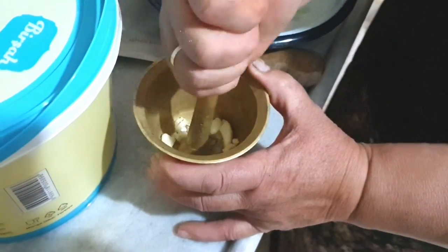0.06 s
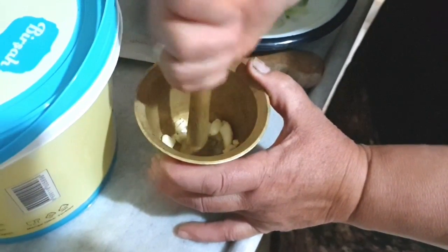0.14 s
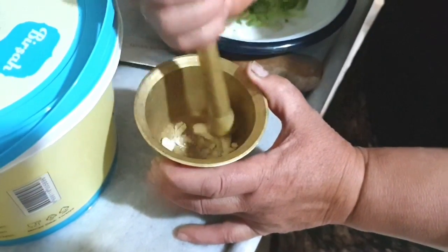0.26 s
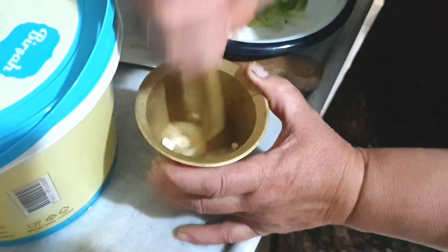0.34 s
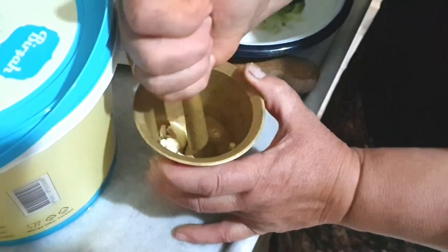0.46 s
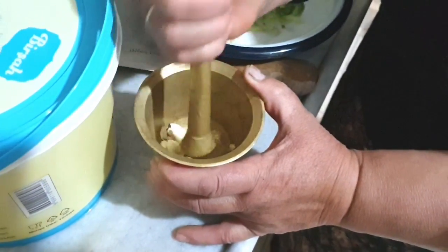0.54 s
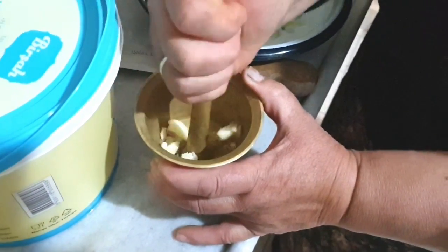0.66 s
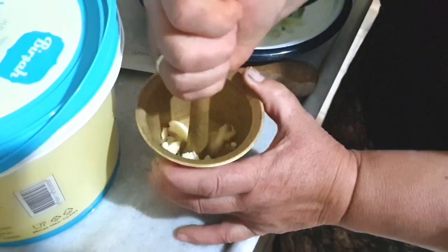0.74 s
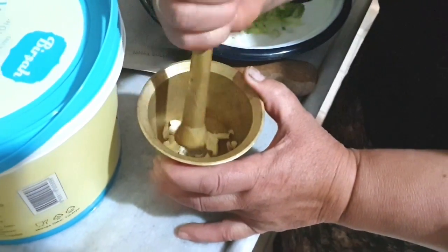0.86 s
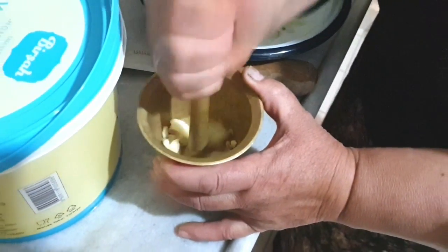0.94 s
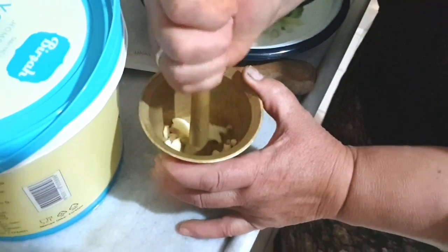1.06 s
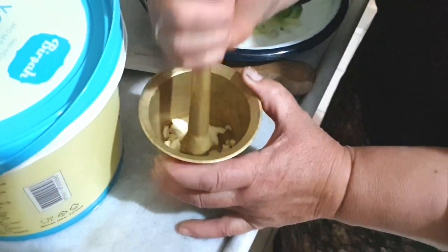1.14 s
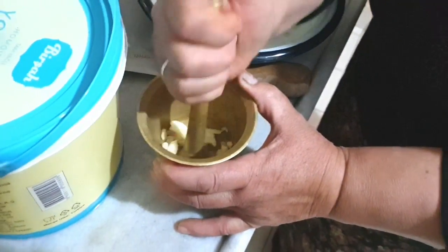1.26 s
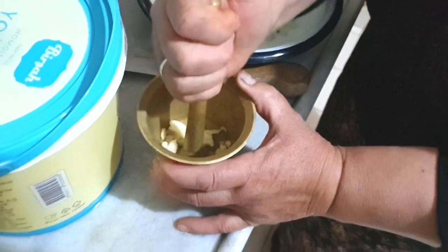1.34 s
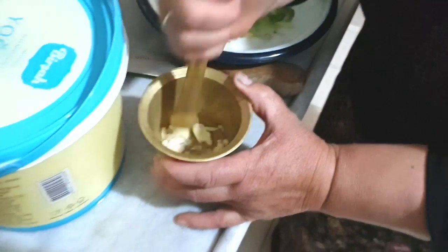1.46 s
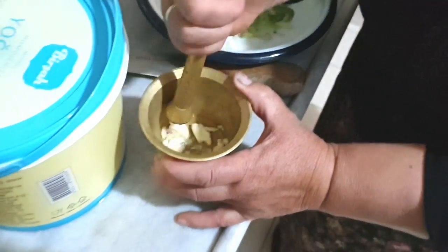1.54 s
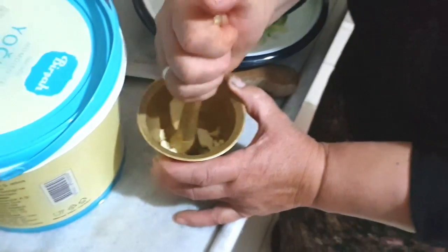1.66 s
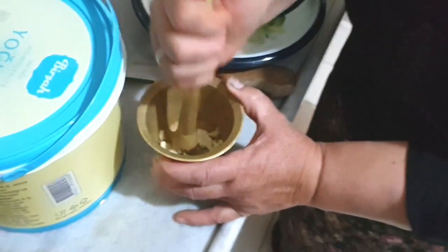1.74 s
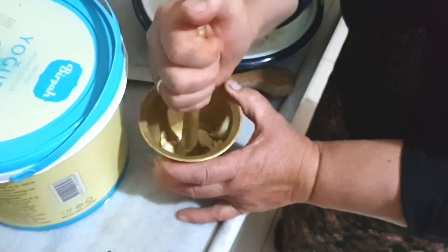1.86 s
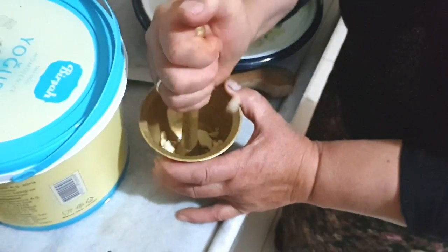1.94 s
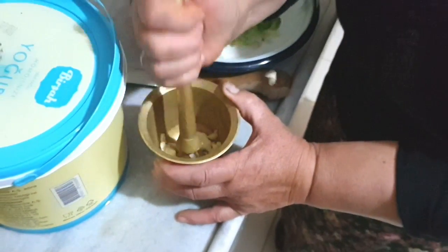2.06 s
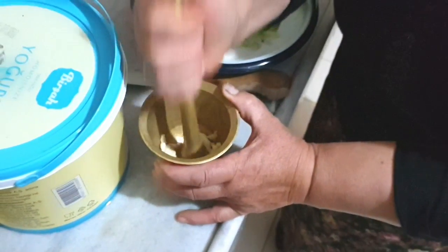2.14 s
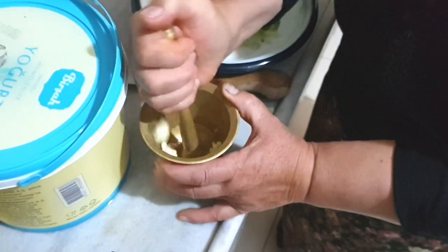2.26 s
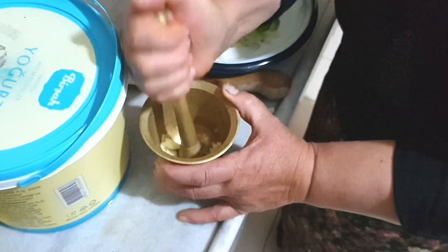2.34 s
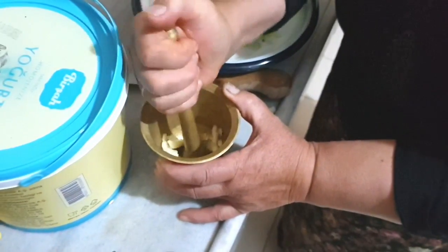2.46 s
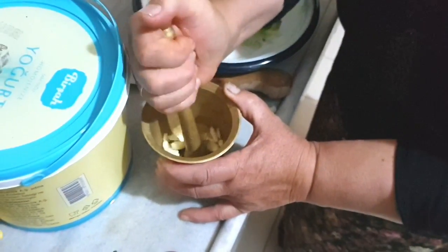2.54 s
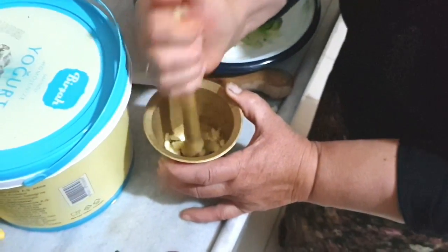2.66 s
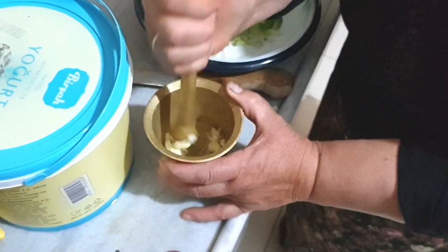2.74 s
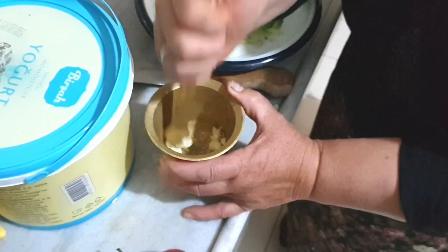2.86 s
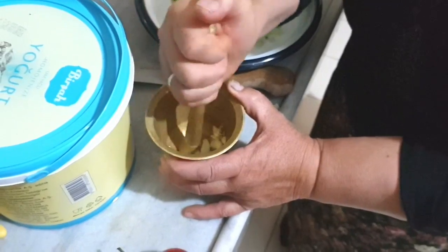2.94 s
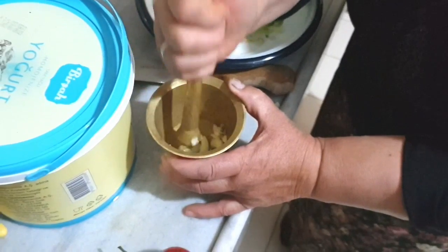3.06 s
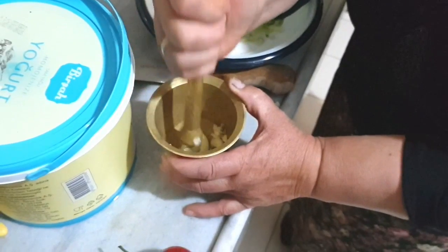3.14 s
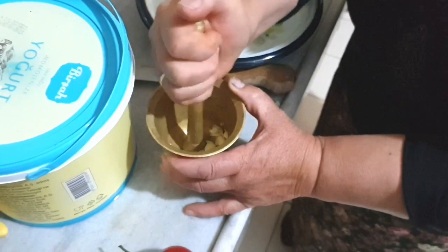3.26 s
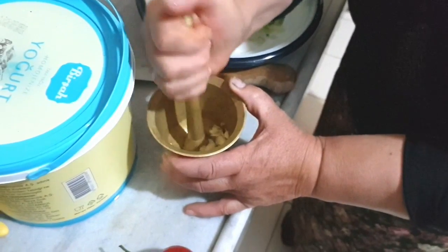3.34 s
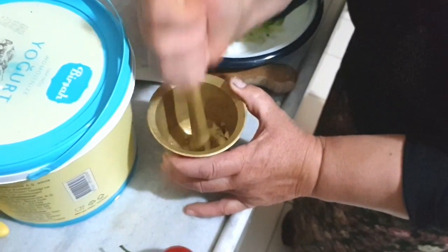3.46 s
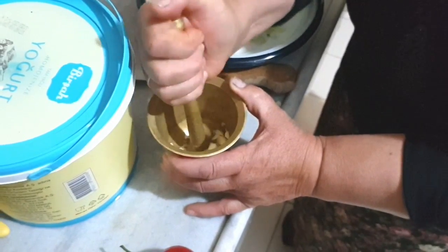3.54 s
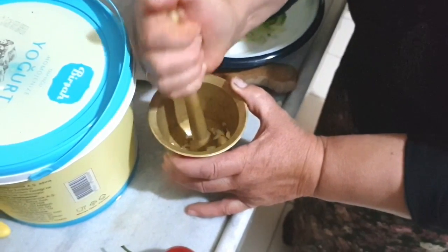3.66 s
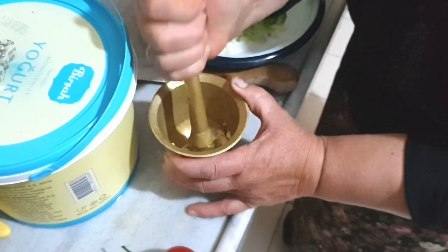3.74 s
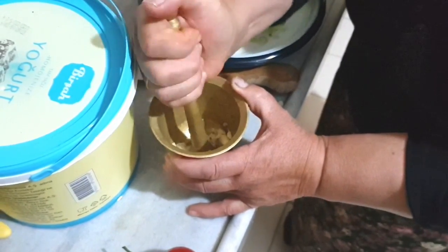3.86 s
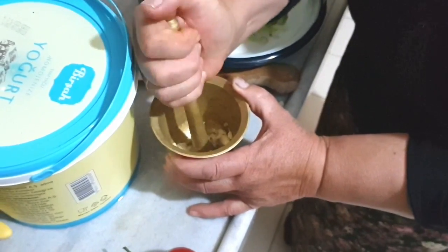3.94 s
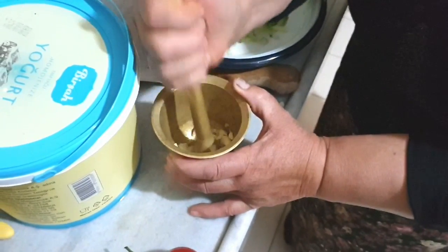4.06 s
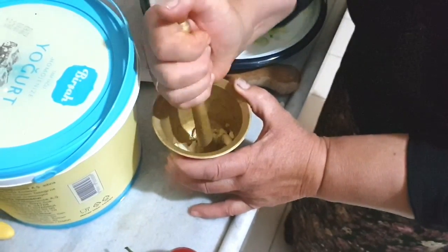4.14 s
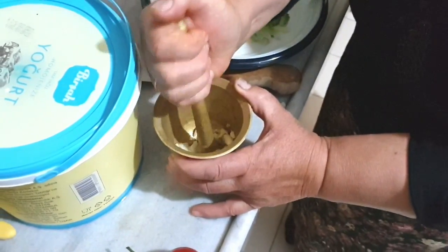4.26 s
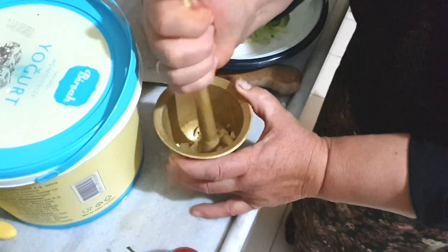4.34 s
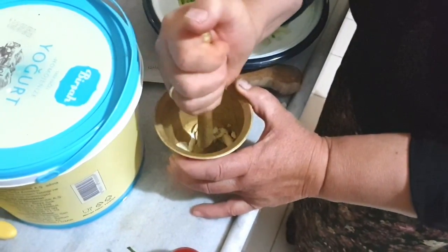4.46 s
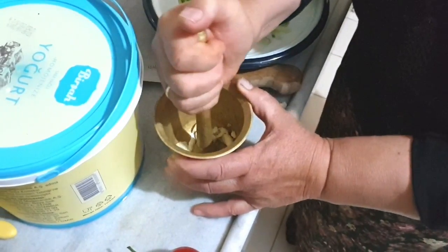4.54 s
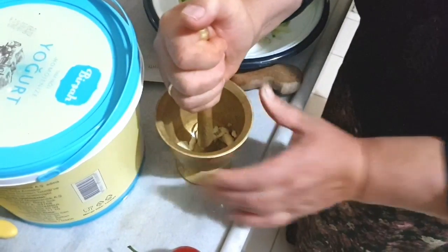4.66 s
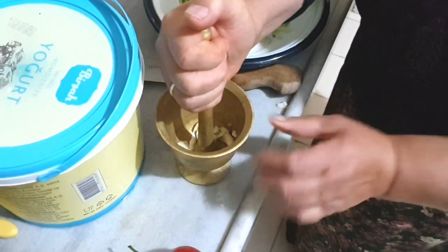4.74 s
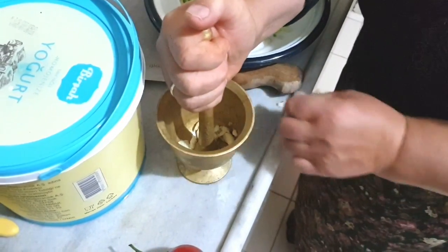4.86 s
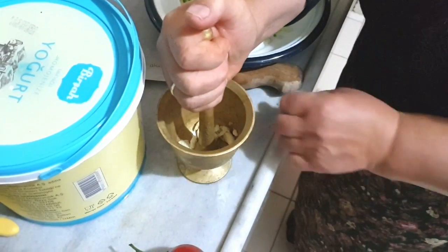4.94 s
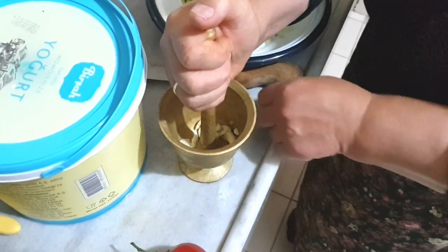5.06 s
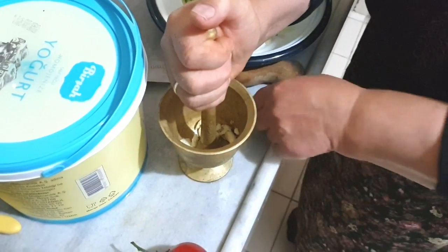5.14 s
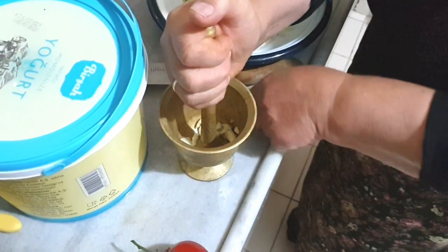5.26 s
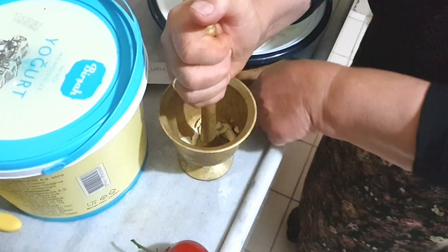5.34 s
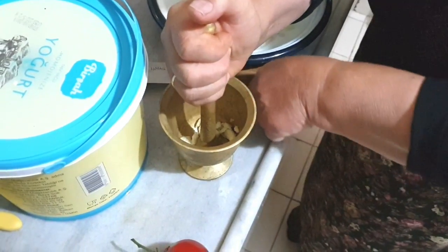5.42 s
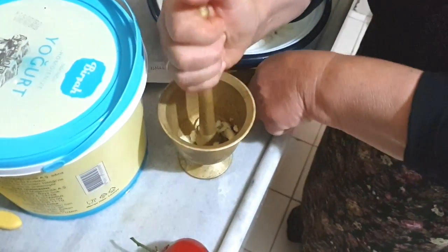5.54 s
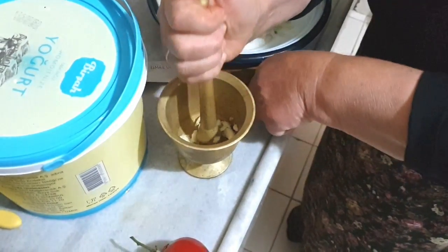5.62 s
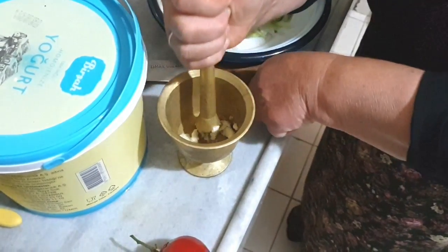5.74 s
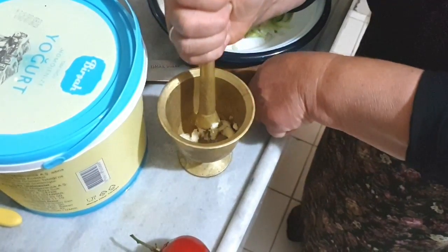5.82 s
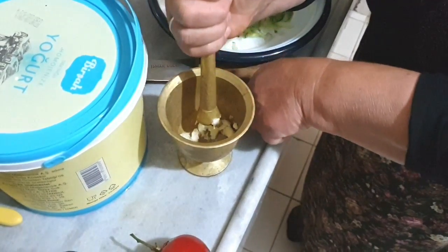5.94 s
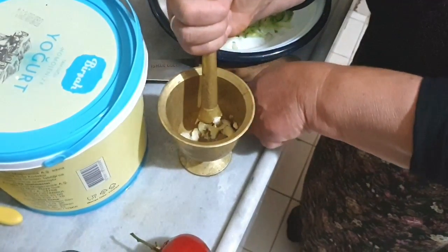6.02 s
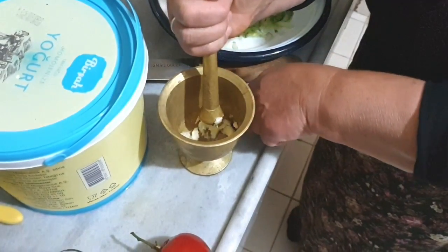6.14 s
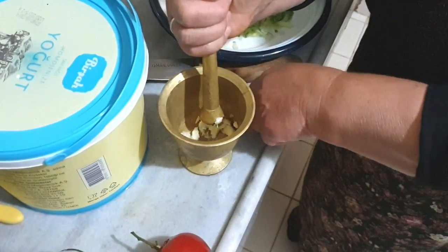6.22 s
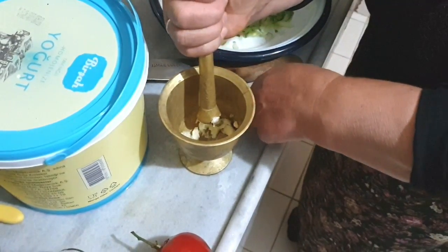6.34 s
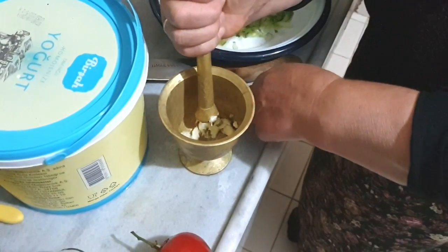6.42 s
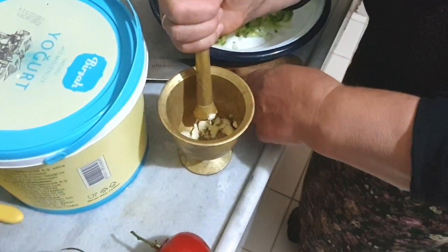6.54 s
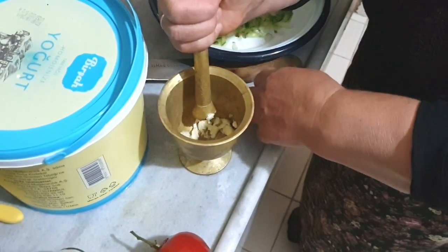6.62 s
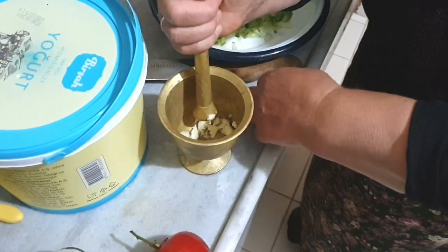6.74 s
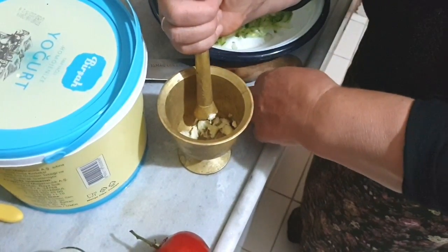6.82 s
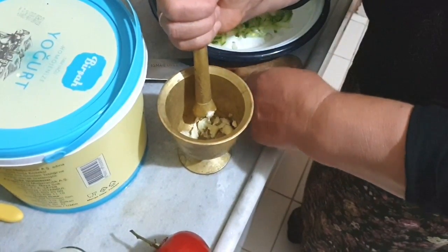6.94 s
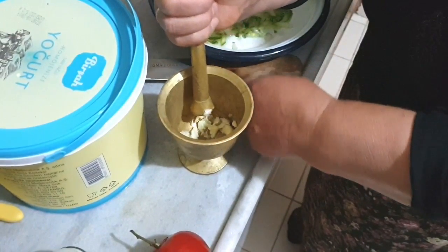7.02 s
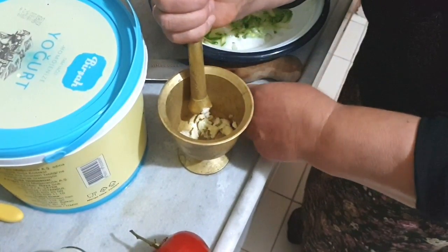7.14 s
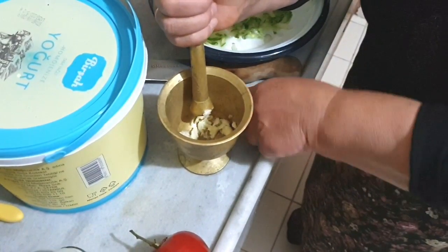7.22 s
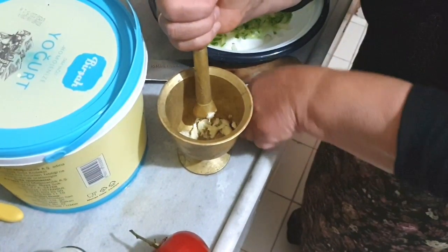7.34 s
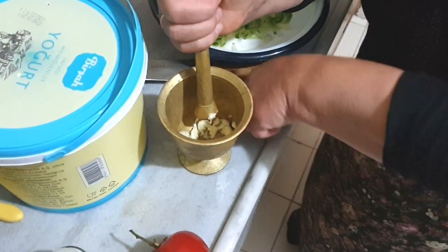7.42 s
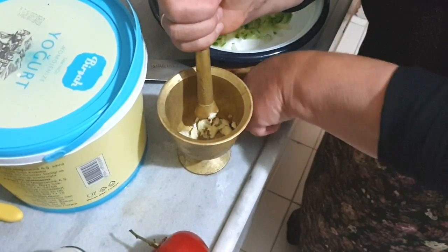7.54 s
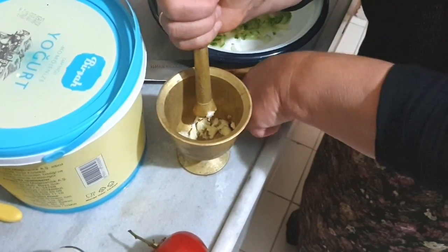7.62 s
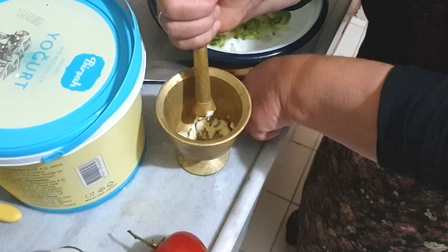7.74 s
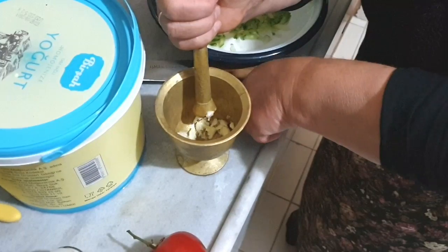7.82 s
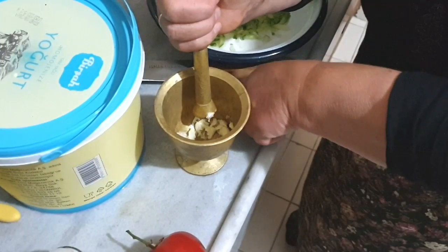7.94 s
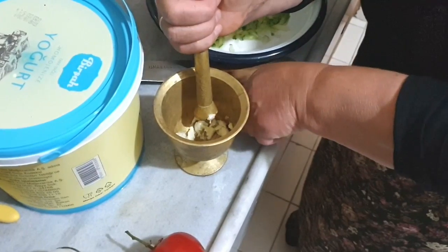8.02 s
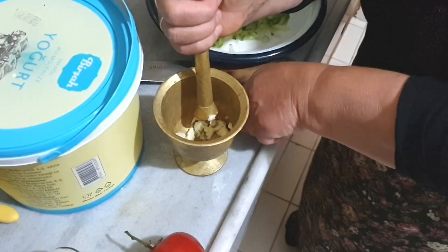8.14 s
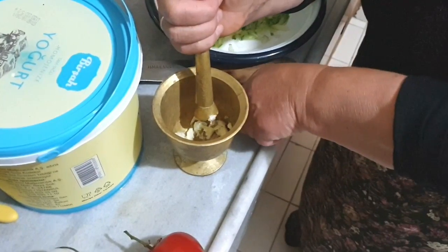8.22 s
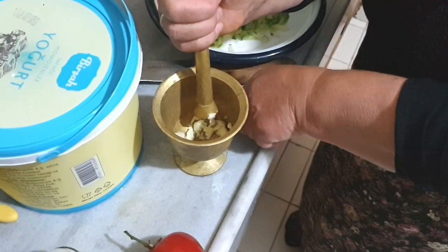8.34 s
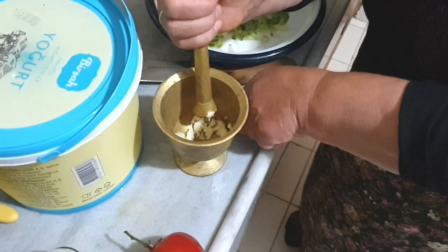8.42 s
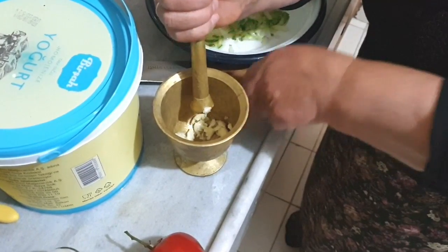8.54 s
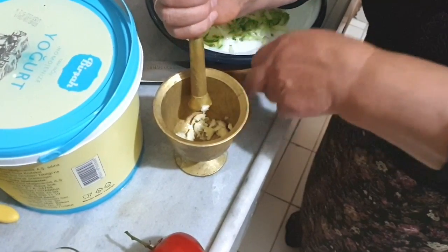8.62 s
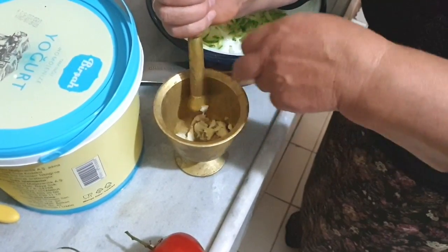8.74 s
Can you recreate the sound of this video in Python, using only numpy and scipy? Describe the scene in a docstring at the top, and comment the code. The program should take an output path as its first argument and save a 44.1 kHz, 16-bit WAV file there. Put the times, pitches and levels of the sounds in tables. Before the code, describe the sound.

Close, uneven mortar pounding on a stone counter, some blows ringing sharply, gives way to faint hollow bumps and rubbing sleeves.

```python
"""Garlic is pounded in a brass mortar on a stone kitchen counter, close to two ports (left, right).
Each blow is filtered noise and dying modes of counter and bowl; cloves split in showers of tiny snaps.
Glancing blows ring the pestle's modes; some set the mortar's foot chattering in broad resonances.
After the pounding the free hand bumps the counter's edge: soft noise knocks, each with a hollow note.
Clothing rustles throughout, as noise shaped by rubbing strength, over a low, swelling room tone."""
import sys
import numpy as np
from scipy import signal
from scipy.fft import rfft, irfft
from scipy.io import wavfile

SR = 44100
rng = np.random.default_rng(int(sys.argv[2]) if len(sys.argv) > 2 else 0)


def to_wav(s):
    """Save 16-bit WAV."""
    ch = np.atleast_2d(s).T  # columns
    pcm = np.round(np.clip(ch, -1, 1) * 32767)  # PCM
    wavfile.write(sys.argv[1], SR, pcm.astype(np.int16))


N = 387198
T = np.arange(SR * 3 // 4) / SR  # time axis of one event, s

# modes of the cupboard under the counter: [f/Hz, level/dB, t60/s]
BOOM = [(72.6, -34, 0.81), (83.4, -37, 0.7), (98.2, -18, 0.099)]


def amp(db):
    """Decibels to gain."""
    return 10 ** (np.asarray(db) / 20)


def unit(x):
    """Scales to rms 1."""
    return x / np.sqrt(np.mean(x ** 2) + 1e-20)


def read(points, hz):
    """Interpolates (Hz, value) points on a log-frequency axis."""
    f, value = np.transpose(points)
    return np.interp(np.log(hz + 1), np.log(f + 1), value)


def add(mix, start_s, sound):
    """Mixes a stereo sound in at start_s, cropped at the end of the mix."""
    part = mix[:, round(start_s * SR):][:, :sound.shape[1]]
    part += sound[:, :part.shape[1]]


def colour(x, spectrum):
    """Filters by a (Hz, dB) spectrum."""
    size = x.shape[-1]
    gain = amp(read(spectrum, np.fft.rfftfreq(size, 1 / SR)))
    return irfft(rfft(x) * gain, size)


def cut(x, hz, kind="low", order=2):
    """Causal Butterworth low- or high-pass."""
    return signal.sosfilt(signal.butter(order, hz, kind, fs=SR, output="sos"), x)


def diffuse(size):
    """White noise at two ports: alike in the bass, unrelated in the treble."""
    # left-right likeness of sound that fills the kitchen: [f/Hz, correlation]
    likeness = [(60, 0.84), (300, 0.94), (700, 0.51), (1300, 0), (15000, 0.014)]
    a, b = rfft(rng.standard_normal((2, size)))
    same = read(likeness, np.fft.rfftfreq(size, 1 / SR))
    return irfft(np.array([a, same * a + np.sqrt(1 - same ** 2) * b]), size)


def wander(width_hz):
    """Slow random signal of rms 1 with a Gaussian spectrum about width_hz wide."""
    lowpass = np.exp(-(np.fft.rfftfreq(N, 1 / SR) / width_hz) ** 2)
    return unit(irfft(rfft(rng.standard_normal(N)) * lowpass, N))


def ring(hz, db, t60, apart_hz=2200):
    """One dying mode; the shorter its wave, the more the ports differ in phase, up to a quarter cycle."""
    lag = min(hz / apart_hz, 1) * np.pi / 2 * rng.choice([-1, 1])
    phase = rng.uniform(0, 2 * np.pi) + np.array([[0], [lag]])
    onset = 1 - np.exp(-T * hz)
    return amp(db - 60 * T / t60) * onset * np.sin(2 * np.pi * hz * T + phase)


def modes(table, vary_db=1.5):
    """All modes of one object, their levels a little different each time."""
    return sum(ring(hz, db + vary_db * rng.standard_normal(), t60) for hz, db, t60 in table)


def afterglow(hz, db, t60=0.31, width_hz=45, build_s=0.025):
    """A tone's echo in the tiled kitchen: a narrow noise band that beats as it dies."""
    band = np.exp(-((np.fft.rfftfreq(len(T), 1 / SR) - hz) / width_hz) ** 2)
    glow = irfft(rfft(diffuse(len(T))) * band, len(T))
    fade = amp(db - 60 * T / t60) * (1 - np.exp(-T / build_s))
    return unit(glow * fade) * np.sqrt(np.mean(fade ** 2))


def kitchen(x, t60=0.25, first_s=0.003):
    """Dense reflections from tiles and cupboards: convolution with decaying noise of unit energy."""
    tail = diffuse(len(T)) * amp(-60 * T / t60) * (T > first_s)
    return signal.fftconvolve(x, tail / np.linalg.norm(tail[0]), axes=1)[:, :x.shape[1]]


def knock(noise, crack_t60_1khz=0.063, crack_slope=0.3, build_cycles=0.66):
    """A crack, shortest in the treble, and the kitchen's answer, which builds up more slowly in the bass."""
    # dense knock of stone and cupboard: [band centre f/Hz, crack level/dB, tail level/dB, tail t60/s]
    bands = [(60, -19, -17, .4), (154, -28, -7.5, 0.21), (324, 3.5, 2, 0.36), (550, 4, 2, 0.39),
             (950, 4.5, 0, 0.4), (1590, 4, -2.5, 0.36), (2480, -6, -6.5, 0.26), (3400, 6.5, -3.5, 0.32),
             (4400, -2.5, -15, 0.26), (7950, -22, -20.5, 0.33), (15200, -16, -34, 0.17)]
    hz = np.fft.rfftfreq(len(T), 1 / SR)
    spectrum, out = rfft(noise), 0
    centres = [row[0] for row in bands]
    # each row of the identity matrix opens one band, overlapping its neighbours
    for share, (centre, crack_db, tail_db, t60) in zip(np.eye(len(bands)), bands):
        band = irfft(spectrum * read(list(zip(centres, share)), hz), len(T))
        crack_t60 = crack_t60_1khz / (centre / 1000) ** crack_slope
        crack = amp(crack_db - 60 * T / crack_t60)
        build = 1 - np.exp(-T * centre / build_cycles)
        tail = amp(tail_db - 60 * T / t60) * build
        out = out + band * np.hypot(crack, tail)
    return out


def room_tone(level_db=-47.5, swell_db=3.5, swell_hz=2.1, top_hz=3000):
    """Low, slowly swelling background of the house: coloured noise."""
    # room spectrum: [f/Hz, relative level/dB]
    spectrum = [(15, -43), (25, -14), (59, 9), (184, -3.5), (241, 2), (602, -8), (1010, -8.5), (1470, -11),
                (4090, -12), (7200, -9), (8240, -22), (11400, -8.5), (15700, -30.5)]
    tone = unit(cut(colour(diffuse(N), spectrum), top_hz, order=1))
    return amp(level_db + swell_db * wander(swell_hz)) * tone


def rubbing(fall_s=0.057):
    """Strength of the cloth's sliding: a slow rub with quick strokes added in power."""
    # rub of sleeve and apron as the arms move: [t/s, relative level/dB]
    rub = [(0, -44.5), (.5, -49), (.95, -74), (1.12, -70), (1.27, -54.5), (1.6, -48.5), (1.83, -64.5),
           (2.0, -48.5), (2.33, -50.5), (2.45, -76), (2.67, -76), (2.83, -55.5), (3.15, -48.5), (3.6, -56),
           (3.85, -48), (4.33, -53), (4.8, -48), (5.37, -52.5), (5.85, -44.5), (6.26, -49), (6.52, -34.5),
           (6.75, -40), (7.35, -55), (7.62, -48.5), (7.655, -36.5), (8.74, -40)]
    # sleeve strokes that swell and stop: [peak t/s, relative level/dB, swell time constant/s]
    swishes = [(3.97, -37.5, 0.16), (4.545, -34.5, 0.043), (5.15, -45, 0.045), (5.71, -45, 0.033),
               (6.42, -39, 0.026), (6.809, -31, 0.038), (7.06, -36, 0.057), (8.04, -32, 0.034),
               (8.25, -41, 0.036), (8.41, -44, 0.021)]
    t = np.arange(N) / SR
    power = amp(np.interp(t, *np.transpose(rub))) ** 2
    for peak_s, db, swell_s in swishes:
        decay = np.maximum((peak_s - t) / swell_s, (t - peak_s) / fall_s)
        power += (amp(db) * np.exp(-decay)) ** 2
    return np.sqrt(power)


def rustle(level_db=6.5, direct=0.18, sway_db=2.01, sway_hz=9, flutter_db=0.4, flutter_hz=47.7,
           grain_db=1.0, grain_hz=640, lag_s=.00027):
    """Cloth slides in countless small slips, off to the right, so the left port hears it later."""
    # cloth spectrum: [f/Hz, relative level/dB]
    spectrum = [(59, -41), (100, -6.5), (166, -4), (201, -16.5), (233, -5), (334, -13.5), (371, -5),
                (449, -11), (983, -8), (1350, -8), (3890, -4), (7040, -8), (8700, -15.5), (11900, -12.5),
                (15700, -20)]
    uneven_db = sway_db * wander(sway_hz) + flutter_db * wander(flutter_hz) + grain_db * wander(grain_hz)
    slips = rng.standard_normal(N)
    near = np.array([np.roll(slips, round(lag_s * SR)), slips])
    ports = np.sqrt(direct) * near + np.sqrt(1 - direct) * diffuse(N)  # direct: share of power
    return rubbing() * amp(level_db + uneven_db) * unit(colour(ports, spectrum))


def garlic(snaps_per_s=5000, low_hz=3000, top_hz=12000, swell_db=-15, swell_s=0.0056,
           split_t60=0.035, lead_s=.03):
    """A quick, dying shower of tiny snaps as a clove splits, with a faint short swell of noise before it."""
    # cloves splitting under the head: [t/s, level/dB]
    crushes = [(0.171, -13), (0.771, -13), (1.096, -9), (1.4160, -15), (2.0030, -19), (2.3173, -6.5),
               (2.6096, -13.5), (3.0645, -20.5), (3.3538, -23), (3.6546, -10), (3.969, -20),
               (4.2614, -13.5), (4.55, -18)]
    out = np.zeros((2, N))
    t = T - lead_s
    swell = amp(swell_db) * np.exp(-abs(t) / swell_s)
    split = amp(-60 * abs(t) / split_t60)
    for split_s, db in crushes:
        snaps = unit(diffuse(len(T)) * (rng.random(len(T)) < snaps_per_s / SR))
        snaps = cut(cut(snaps, low_hz, "high", order=1), top_hz, order=1)
        add(out, split_s - lead_s, amp(db) * snaps * np.where(t < 0, swell, split))
    return out


def pounding(alike=0.82):
    """Every blow takes much the same path through the counter; garlic softens the contact."""
    # blows: [t/s, force/dB, contact cut-off f/Hz (low when garlic cushions the blow, and for the soft thumps
    # that come with glancing clinks), boom/dB, bowl ring/dB]
    blows = [(0.1695, 0, 3520, -5, -3), (0.445, -18.5, 343, 2.5, 6), (0.7723, -3.5, 5150, 6.5, 4.5),
             (1.074, -25.5, 3000, -12.5, -11), (1.0971, 1.5, 5370, -2, 1.5), (1.4157, -5, 2930, 0, -1),
             (1.664, -19, 400, -10, 0), (2.0113, -9, 363, 2, 0), (2.317, 2, 4230, 5, -1.5),
             (2.607, 0, 4300, 0.5, 1), (2.958, -26.5, 400, -14, 0), (3.0638, -12.5, 4560, -16, 4),
             (3.3570, -11, 254, 4, -5), (3.6550, -2.5, 3300, -0.5, -2.5), (3.9730, -22.5, 508, -8.5, 0),
             (4.2660, -11.5, 347, 3.5, 2), (4.548, -8, 3930, -4.5, -3)]
    # counter slab under the mortar's foot: [f/Hz, level/dB, t60/s]
    slab = [(176, -25, 0.33), (240.8, -15.5, 0.23), (308.9, -13.5, 0.22), (400.6, -18.5, 0.31),
            (461, -5.5, 0.04), (578, -15.5, 0.12), (770.6, -13, 0.14), (932, -14, 0.13), (1069, -14, 0.17),
            (1138, -14.5, 0.15), (1408, -17.5, 0.15), (1540, -17.5, 0.09), (1620, -17.5, 0.17),
            (2430, -20, 0.14)]
    # bowl, mostly damped by the hand: [f/Hz, level/dB, t60/s]
    bowl = [(3340, 1.5, 0.029), (3360, -22, 0.3), (6200, -35, .08)]
    out, path = np.zeros((2, N)), diffuse(len(T))
    for start_s, force_db, contact_hz, boom_db, bowl_db in blows:
        # alike: share of the noise power common to all blows
        body = knock(np.sqrt(alike) * path + np.sqrt(1 - alike) * diffuse(len(T)))
        body += modes(slab) + amp(bowl_db) * modes(bowl)
        struck = amp(force_db) * cut(body, contact_hz)
        add(out, start_s, struck + amp(boom_db) * modes(BOOM))
    return out


def clinks(tick_db=-11, tick_t60=0.1, tick_low_hz=1300, tick_top_hz=6000, tick_wet_db=-7,
           glow_db=-17, fill_s=0.087, tink_s=7.222):
    """Brass on brass: a tick, then modes whose strengths depend on the place of contact."""
    # pestle against the wall: [t/s, force/dB, contact cut-off f/Hz, place (0 shaft - 1 head)]
    strikes = [(0.4430, 3, 12300, 0.19), (1.6617, 1, 14900, 1), (1.685, -5.5, 12000, 0.42),
               (2.9551, -1.5, 13350, 0.87), (3.0160, -10.5, 4200, 0.73), (8.7590, -2.5, 2860, 0.66)]
    # pestle modes, the strongest a beating pair, and rim tones:
    # [f/Hz, level struck on shaft/dB, level struck on head/dB, t60/s]
    brass = [(1425, -18, -23.5, 0.18), (3125, -14.5, -20.5, 0.13), (3240, -1.5, -33, 0.17),
             (3764, -10, -17, .33), (3781, 4, -12, .09), (4160, -26.5, -14, .04), (4900, -33, -12, 0.024),
             (6878, -17.5, -4, 0.076), (7671, -21, -33, .16), (8805, -31, -21, .08), (13410, -35, -18, .06),
             (14660, -38, -22, .06), (10440, -18, -23, 0.05), (10820, -39, -19, 0.055),
             (11550, -19, -37, 0.088)]
    # faint high tink as the pestle shifts: [f/Hz, level/dB, t60/s]
    tink = [(8800, -44, .3), (10420, -43, 0.23)]
    out = np.zeros((2, N))
    for start_s, force_db, contact_hz, place in strikes:
        tick = diffuse(len(T)) * amp(tick_db - 60 * T / tick_t60)
        tick = cut(cut(tick, tick_low_hz, "high", order=1), tick_top_hz, order=1)
        clang = tick + amp(tick_wet_db) * kitchen(tick)
        for hz, shaft_db, head_db, t60 in brass:
            db = shaft_db + place * (head_db - shaft_db)
            filled = np.sqrt(min(t60 / fill_s, 1))  # short modes excite less echo
            clang += ring(hz, db, t60) + afterglow(hz, db + glow_db) * filled
        add(out, start_s, amp(force_db) * cut(clang, contact_hz))
    add(out, tink_s, modes(tink))
    return out


def clacks(width_hz=480, t60=0.07, tail_db=-14, tail_t60=0.4, level_db=-9, top_ratio=1.13):
    """The foot chatters briefly on the stone, each contact in one broad resonance."""
    # mortar rocking on its foot after a glancing blow: [t/s, relative level/dB, clatter centre f/Hz]
    contacts = [(0.4720, 1, 3330), (0.475, 2.5, 1210), (0.486, 2.5, 850), (1.73, -8.5, 3480),
                (1.739, -6, 1150), (1.751, -8.5, 746), (3.065, -2, 1240), (3.121, -8, 1110)]
    out = np.zeros((2, N))
    fade = amp(-60 * T / t60) + amp(tail_db - 60 * T / tail_t60)
    for start_s, db, hz in contacts:
        edges_hz = [hz / (1 + width_hz / hz / 2), hz + width_hz / 2]
        resonance = signal.butter(1, edges_hz, "band", fs=SR, output="sos")
        chatter = unit(signal.sosfilt(resonance, diffuse(len(T)) * fade))
        chatter = chatter * np.sqrt(np.mean(fade ** 2))
        add(out, start_s, amp(level_db + db) * cut(chatter, top_ratio * hz, order=1))
    return out


def bumps(note_t60=0.33, contact_hz=1200, glow_db=-6, low_hz=200, boom_db=9):
    """Soft, blurred knocks with one hollow note and a little of the cupboard's boom."""
    # free hand on the counter's edge and cupboard front:
    # [t/s, level/dB, hollow note f/Hz, rattle above the note/dB, softness of touch/s]
    touches = [(4.772, -36.5, 318, -17, .005), (5.268, -33, 309.5, 11.5, .0005),
               (6.964, -35.5, 479, 11, .006), (7.012, -36.5, 446, 10, .006), (7.189, -30, 295, 5.5, 0.0071),
               (7.383, -36, 451, 9.5, 0.0063), (7.439, -34.5, 465, 12.5, 0.0033),
               (7.553, -45, 406, 15.5, .006)]
    out = np.zeros((2, N))
    for start_s, db, hz, rattle_db, soft_s in touches:
        rattle = cut(cut(knock(diffuse(len(T))), contact_hz), low_hz, "high")
        rattle = rattle * (1 - np.exp(-T / soft_s))
        note = ring(hz, 0, note_t60) + afterglow(hz, glow_db)
        bump = note + amp(rattle_db) * rattle + amp(boom_db) * modes(BOOM)
        add(out, start_s, amp(db) * bump)
    return out


def scene(garlic_wet_db=-7, left_db=1.09, brass_left_db=0.6):
    """All sources together, stronger on the left; each balance is added left and taken off right."""
    brass = clinks() * amp([[brass_left_db], [-brass_left_db]])
    cloves = garlic()
    mortar = pounding() + brass + clacks() + cloves + amp(garlic_wet_db) * kitchen(cloves)
    return (mortar + bumps() + rustle() + room_tone()) * amp([[left_db], [-left_db]])


def record(dry, edge_hz=15900):
    """Smooth saturation, strong only near full scale, then a steep low-pass."""
    clipped = dry / (1 + dry ** 8) ** (1 / 8)
    lowpass = signal.firwin(511, edge_hz, window=("kaiser", 9), fs=SR)
    return signal.oaconvolve(clipped, lowpass[None], "same")


dry = scene()
out = record(dry)
to_wav(out)
```